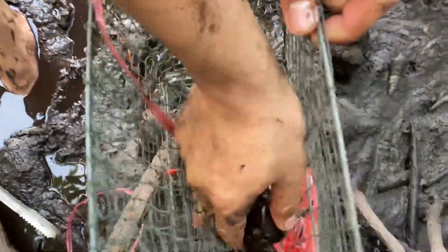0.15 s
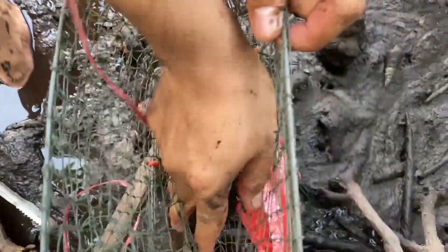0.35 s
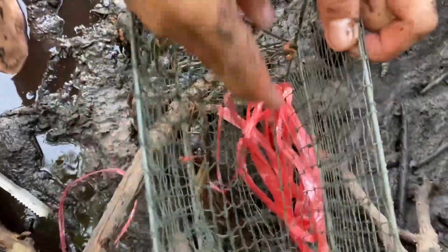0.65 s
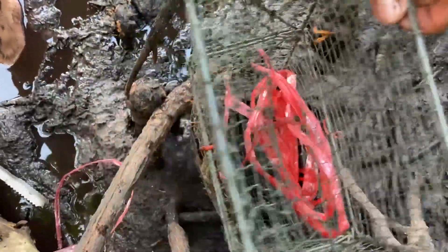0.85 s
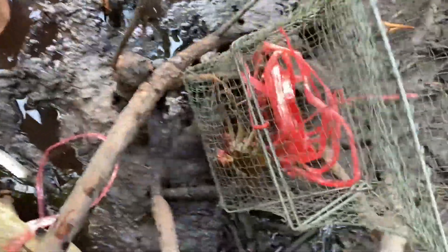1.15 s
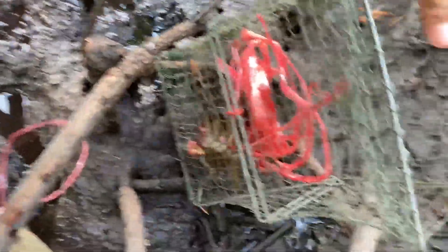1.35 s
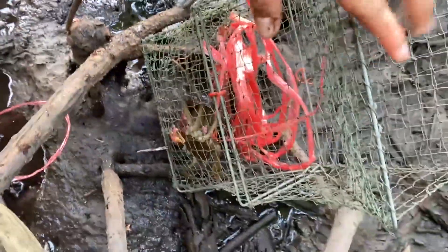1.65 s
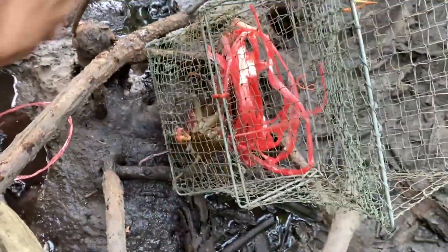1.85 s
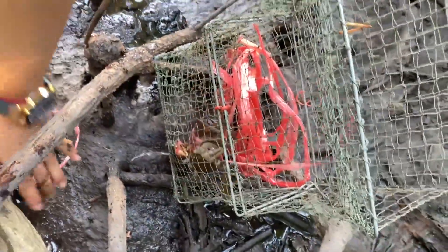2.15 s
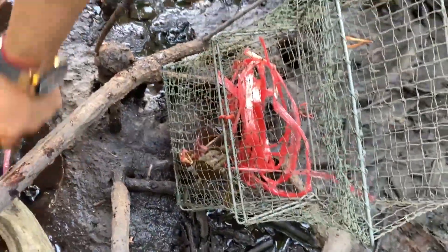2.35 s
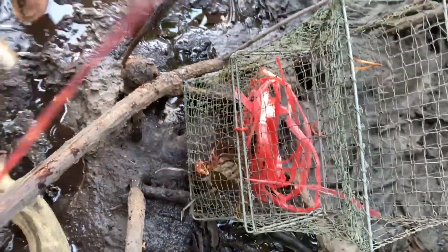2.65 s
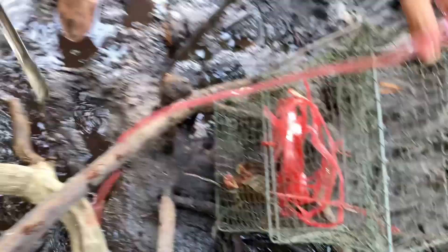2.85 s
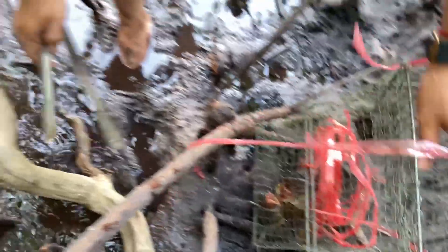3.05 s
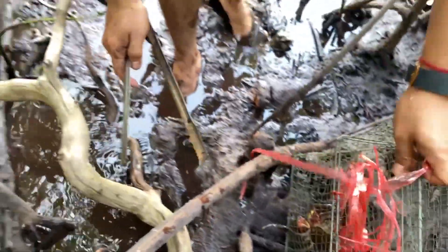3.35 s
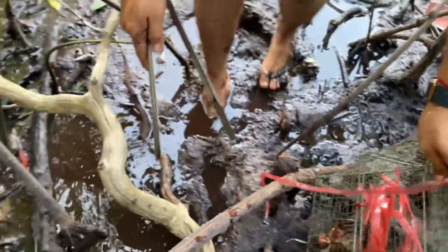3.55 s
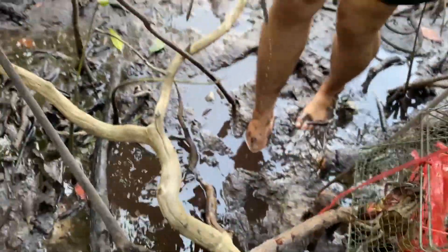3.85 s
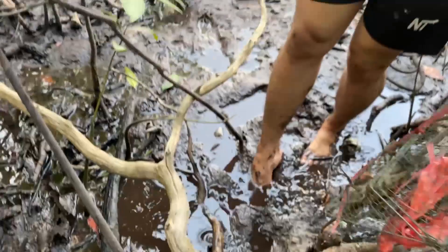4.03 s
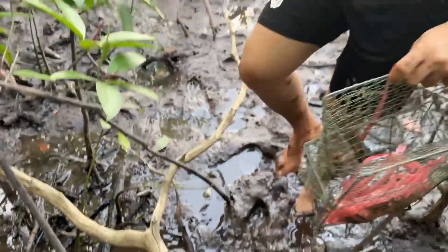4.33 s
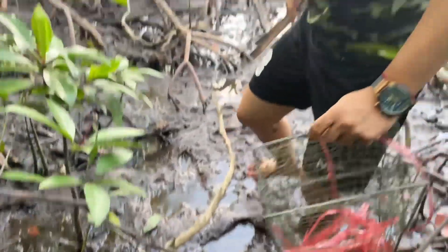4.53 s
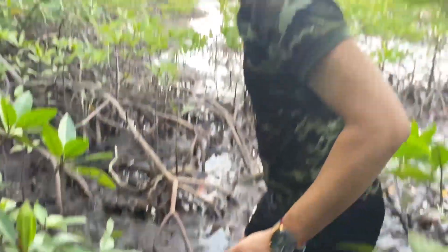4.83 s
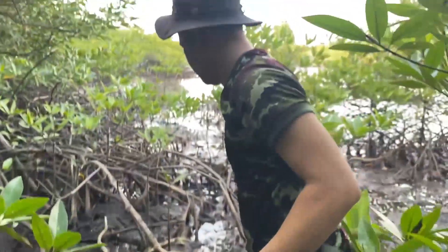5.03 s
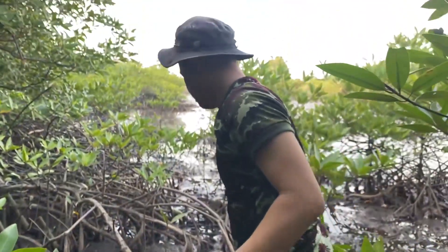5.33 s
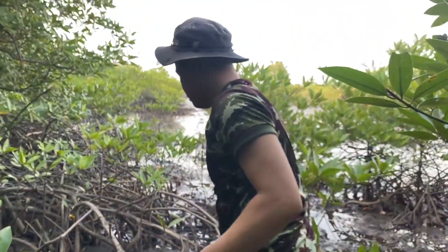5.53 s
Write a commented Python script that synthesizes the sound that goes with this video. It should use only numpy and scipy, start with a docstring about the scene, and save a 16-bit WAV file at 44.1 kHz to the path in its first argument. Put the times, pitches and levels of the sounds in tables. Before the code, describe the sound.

Close handling of a net trap with crisp snaps and a scraping ribbon, followed by short wet mud slurps over a low outdoor rumble.

```python
"""A mangrove flat: a wire-mesh crab trap is baited and lifted, a plastic ribbon drawn out, bare feet tread wet mud.
Netting and ribbon are swarms of tiny noise clicks shaped by hand strokes; sharper ticks are snaps with a short ring.
Mud crackles as small decaying sines and film clicks; air pockets swell and ring, slurps are trembling glides.
Bird calls glide far off among the trees over a low noise rumble and a faint hiss of open air.
A hand-held phone hears it through two ports, which shift the treble's phase; carrying it adds low noise."""
import sys
import numpy as np
from scipy import signal
from scipy.fft import rfft, irfft
from scipy.io import wavfile
from scipy.ndimage import uniform_filter1d

SR = 44100
rng = np.random.default_rng(int(sys.argv[2]) if len(sys.argv) > 2 else 0)


def wrap_up_sound(samples):
    """Save the sound to the file named by the first command line argument, as 16-bit audio."""
    columns = np.atleast_2d(samples).T
    # keep every value between -1 and 1, then stretch to whole-number steps
    tamed = np.clip(columns, -1, 1)
    steps = np.round(tamed * 32767).astype(np.int16)
    wavfile.write(sys.argv[1], SR, steps)


N = 250929
TIME = np.arange(N) / SR  # s
FREQS = np.arange(N // 2 + 1) * SR / N  # Hz


def undb(db):
    """Decibels to gain."""
    return 10 ** (np.asarray(db) / 20)


def unit(x):
    """Scale to rms 1."""
    return x / np.sqrt(np.mean(x ** 2))


def balance(left_over_right_db):
    """Gains of the left and right port, half the difference on each."""
    return undb(np.array([[left_over_right_db], [-left_over_right_db]]) / 2)


def gain_curve(rows):
    """Gain over time from (start_s, level_db) rows, at -120 dB outside them."""
    s, db = np.transpose(rows)
    return undb(np.interp(TIME, s, db, left=-120, right=-120))


def strokes(rows, attack_s, release_s):
    """Gain over time of (start_s, hold_s, level_db) movements: each swells up to its start, holds and dies away."""
    power = 0
    for s, hold, db in rows:
        before = np.maximum(s - TIME, 0) / attack_s
        after = np.maximum(TIME - s - hold, 0) / release_s
        power = power + undb(db) ** 2 * np.exp(-2 * np.minimum(before + after, 20))
    return np.sqrt(power)


def walk(rate_per_s):
    """Smooth random wander of spread 1."""
    return unit(signal.resample(rng.standard_normal(int(rate_per_s * N / SR) + 2), N))


def colour(x, points):
    """Filter by a (freq_hz, level_db) spectrum, straight in log frequency; rms 1."""
    hz, db = np.transpose(points)
    gain = undb(np.interp(np.log(FREQS + 1), np.log(hz), db))
    return unit(irfft(rfft(x) * gain, N))


def add(out, s, x):
    """Mix a short sound in at time s."""
    i = max(int(s * SR), 0)
    out[..., i:i + x.shape[-1]] += x[..., :N - i]


def lead(pair, radians):
    """Let the left channel lead the right by a phase at each frequency."""
    return irfft(rfft(pair) * np.exp(.5j * np.array([radians, -radians])), N)


def scatter(x, t60, wet_db):
    """Direct sound plus a diffuse tail from ground, roots and leaves, different at each port."""
    t = TIME[:int(t60 * SR) + 2]
    tail = rng.standard_normal((2, len(t))) * np.exp(-np.log(1000) * t / t60)
    tail *= undb(wet_db) / np.linalg.norm(tail, axis=1, keepdims=True)
    wet = signal.fftconvolve(np.atleast_2d(x), tail, axes=-1)[:, :x.shape[-1]]
    return (x + wet) / np.hypot(1, undb(wet_db))


def slips(rate_per_s, spread_db, decay_s, apart_db):
    """Tiny noisy clicks of uneven size, partly different at the two ports."""
    size = undb(spread_db * np.clip(rng.standard_normal(N), -2, 2))
    energy = size ** 2 * (rng.random(N) < rate_per_s / SR)
    energy = signal.lfilter([1], [1, -np.exp(-1 / (decay_s * SR))], energy + 1e-9)
    energy /= uniform_filter1d(energy, SR // 16)  # level out the slower swells
    noise = rng.standard_normal(N) + undb(apart_db) * rng.standard_normal((2, N))
    return np.sqrt(energy) * noise


def whistles(rows, waver, t60, wet_db):
    """Gliding tones whose pitch trembles by a share (waver), each with a scattered tail."""
    out = np.zeros((2, N))
    for s, length, start_hz, end_hz, db in rows:
        u = np.linspace(0, 1, int(length * SR))
        tremble = np.interp(u * length, np.arange(200) / 400, rng.standard_normal(200))
        pitch = (start_hz + (end_hz - start_hz) * u) * (1 + waver * tremble)
        note = np.sqrt(4 * u * (1 - u)) * np.sin(2 * np.pi * np.cumsum(pitch) / SR)
        add(out, s, undb(db) * scatter(np.pad(note, (0, SR // 2)), t60, wet_db))
    return out


def background(apart_db=-7, skew_db=-4, air_db=-62):
    """A low rumble, nearly alike at both ports, under the faint hiss of open air."""
    # rumble spectrum: freq_hz, level_db
    rumble_colour = [(22, -29), (34, -28), (48, -1), (61, -1.5), (72, 1.5), (88, 0), (103, -6), (122, -1.5),
                     (150, -7.5), (200, -15), (275, -20), (330, -25), (480, -35.5), (1000, -74)]
    # open-air spectrum: freq_hz, level_db
    air_colour = [(200, 16.5), (400, 7.5), (800, 7), (1500, -6), (2500, -8.5), (4000, -0.5), (8000, -15.5),
                  (11000, -33.5), (16000, -94)]
    rumble_db, wander_db, wander_per_s = -48, 1.3, 12
    low = rng.standard_normal(N) + undb(apart_db) * rng.standard_normal((2, N))
    low = colour(low, rumble_colour)
    low /= np.sqrt(uniform_filter1d(np.mean(low ** 2, axis=0), SR // 6))  # steady before it wanders
    low *= undb(rumble_db + wander_db * walk(wander_per_s)) * balance(skew_db)
    # the hiss is mostly separate at the two ports
    air = colour(rng.standard_normal(N) + 3.04 * rng.standard_normal((2, N)), air_colour)
    return low + undb(air_db) * air


def netting(lift_db=3, apart_db=-2):
    """Strands catch and slip over each other in dense little clicks."""
    # strokes of hands and leaves over the netting, before the common lift:
    # start_s, hold_s, level_db, fizz_db (fine fizz of the strands relative to the stroke)
    rubs = [(0.034, 0.095, -64, -37), (0.224, 0.12, -58.5, -11), (0.498, 0.083, -47.5, -9.5),
            (1.255, 0.09, -67, -18), (1.434, 0.17, -70.5, -20), (1.75, 0.074, -68.5, -26),
            (3.01, 0.41, -63, -13), (3.34, .015, -54.5, -19), (3.498, 0.34, -64.5, -13),
            (4.315, 0.081, -57.5, -17), (4.79, 0.11, -58, -24), (5.272, 0.12, -65.5, -13),
            (5.555, 0.1, -67, -21)]
    # netting spectrum: freq_hz, level_db
    net_colour = [(150, -7), (350, 3), (600, 4), (1100, 0), (1900, 1.5), (2700, -5), (4200, 0.5),
                  (7000, 0.5), (8500, 2), (10300, -2.5), (12000, -12.5), (15000, -14), (16500, -58)]
    # spectrum of the fine fizz: freq_hz, level_db
    fizz_colour = [(5000, -43), (9000, -18), (11500, -12), (15000, -7.5), (16500, -18)]
    attack_s, release_s = 0.031, 0.067
    # the trap stirs faintly, more once it is tied and carried; levels before the lift
    rest_db, carried_db, picked_up_s = -78.5, -71, 1.9
    grain = slips(2600, 4.5, .0007, apart_db)
    rub = strokes([(s, hold, db) for s, hold, db, _ in rubs], attack_s, release_s)
    fizz = strokes([(s, hold, db + fizz_db) for s, hold, db, fizz_db in rubs], attack_s, release_s)
    stir = undb(np.where(TIME < picked_up_s, rest_db, carried_db))
    body = colour(grain, net_colour) * np.hypot(rub, stir)
    return undb(lift_db) * (body + colour(grain, fizz_colour) * fizz)


def birds(lift_db=2):
    """Thin far calls: gliding tones smeared by the trees."""
    # bird notes, before the common lift and the smearing: start_s, length_s, start_hz, end_hz, level_db
    notes = [(.78, 0.12, 3700, 3580, -61), (.83, 0.27, 4040, 3610, -64.5), (.9, .081, 3555, 3330, -59.5),
             (.94, 0.029, 2120, 2270, -57.5), (1.0, .27, 3330, 3010, -72.5),
             (1.1, 0.085, 3680, 3410, -61.5), (1.2, 0.059, 2140, 2206, -62),
             (1.249, 0.13, 3420, 3470, -66.5), (1.63, 0.047, 2890, 2910, -61),
             (1.68, 0.098, 3004, 3153, -57.5), (2.455, .4, 3183, 3280, -64), (3.17, 0.17, 3234, 3136, -57),
             (.1, 0.32, 7730, 7700, -62.5), (1.44, 0.069, 7760, 7970, -59.5), (1.89, 0.44, 7940, 7910, -64)]
    return undb(lift_db) * whistles(notes, waver=.021, t60=.6, wet_db=5)


def ticks(snap_s=0.0034, ring_s=0.00096, lift_db=3.5):
    """A short broad snap with a ring of a few cycles from the strand or film that let go."""
    # sharpest ticks of mesh, ribbon and breaking mud film, before the lift, scattering and halved snap:
    # start_s, peak_db, ring_hz, snap_db (broad snap relative to the ring)
    tick_rows = [(.1165, -37, 6140, -8), (.1465, -44, 1570, -23), (.305, -38.5, 1670, -13),
                 (.375, -44.5, 11000, -3.5), (.41, -42.5, 1660, -23), (.4925, -39, 3830, 5.5),
                 (.571, -32.5, 1840, -13), (.5775, -26.5, 1410, -24), (.592, -34.5, 10400, -20),
                 (.674, -48, 1600, 2.5), (1.3375, -36, 5430, -23), (1.801, -45, 5740, -4.5),
                 (2.099, -39.5, 5000, -6), (2.147, -43.5, 1840, -7), (2.352, -48, 4170, -2),
                 (2.5525, -39.5, 6560, -1.5), (2.6678, -34.5, 9260, -13), (2.765, -47, 7200, 1),
                 (2.9225, -37, 9950, -7.5), (2.9825, -37.5, 10300, -11), (3.042, -46, 9400, -1.5),
                 (3.492, -42.5, 6350, 6), (3.625, -39.5, 6460, 0), (3.69, -31.5, 3500, -16),
                 (3.7808, -35.5, 3750, -27), (3.7975, -31.5, 4850, -3.5), (4.2552, -36, 4270, -12),
                 (4.32, -38.5, 5500, -4), (4.3682, -38, 6700, 1.5), (4.55, -44, 3180, -11),
                 (4.789, -53, 1600, -4.5), (5.164, -35, 2360, -2)]
    # spectrum of the snap: freq_hz, level_db
    tick_colour = [(400, -23), (1500, -23), (4000, 5.5), (7000, 1.5), (10000, 4.5), (14000, -5.5),
                   (16000, -4)]
    out, t = np.zeros((2, N)), TIME[:SR // 30]
    hiss = colour(rng.standard_normal(N), tick_colour)
    for k, (s, db, hz, snap_db) in enumerate(tick_rows):
        snap = hiss[k * len(t):(k + 1) * len(t)] * np.exp(-t / snap_s)
        ring = np.sin(2 * np.pi * hz * t) * np.exp(-t / ring_s)
        tick = ring + .5 * undb(snap_db) * snap
        add(out, s, undb(db + lift_db) * scatter(tick, t60=.028, wet_db=-3))
    return out


def sliding_echo(x, lag_s, share):
    """A close reflection whose path changes as the hands move, sweeping the colour."""
    late = TIME - lag_s * np.exp(0.286 * walk(9))
    return x + share * np.array([np.interp(late, TIME, port) for port in x])


def ribbon(lift_db=2, catch_db=2.0, lead_ms=0.31, apart_db=-2):
    """The ribbon chatters and squeaks as it is pulled, off to the left."""
    # pulls, sliding over wood and mesh, before lift and catching: start_s, hold_s, level_db
    pulls = [(2.07, 0.12, -57.5), (2.1, 0.087, -52), (2.355, 0.019, -51.5), (2.42, 0.17, -55.5),
             (2.54, 0.057, -55), (2.666, 0.057, -52), (2.75, 0.024, -63), (2.81, 0.11, -56)]
    # squeaks where the ribbon catches, before scattering: start_s, length_s, start_hz, end_hz, level_db
    squeaks = [(2.09, 0.055, 5300, 6000, -47), (2.165, 0.021, 4910, 5500, -42.5),
               (2.8, 0.055, 6550, 6670, -53.5), (2.86, 0.072, 4950, 4850, -50),
               (3.03, 0.051, 5830, 4700, -56)]
    # ribbon spectrum: freq_hz, level_db
    ribbon_colour = [(400, -2), (1200, -6.5), (2200, -8.5), (3200, -2), (5200, 1), (6700, -1), (8200, -5),
                     (10300, -2.5), (12000, -10.5), (15000, -9), (16500, -31)]
    grain = sliding_echo(slips(3200, 4, .0008, apart_db), lag_s=.0006, share=.35)
    pull = strokes(pulls, attack_s=0.0096, release_s=0.03)
    catching = undb(catch_db * walk(50))
    chatter = undb(lift_db) * colour(grain, ribbon_colour) * pull * catching
    both = chatter + whistles(squeaks, waver=.032, t60=.04, wet_db=0)
    # the head start of the left port, two turns at most
    phase = np.minimum(2 * np.pi * FREQS * lead_ms / 1000, 4 * np.pi)
    return lead(both, phase)


def mud_squeeze():
    """Gain over time of the squeezed mud, which holds and gives way in little jerks."""
    # a foot presses into the mud or pulls free, before the jerks: start_s, hold_s, crackle level_db
    presses = [(3.348, 0.054, -46.5), (3.49, 0.064, -56), (3.69, 0.029, -49.5), (3.775, 0.063, -54.5),
               (4.262, 0.071, -46.5), (4.36, 0.052, -55.5), (4.55, 0.01, -66), (4.8, 0.017, -57.5),
               (5.205, 0.039, -55), (5.27, 0.0056, -45.5), (5.3, 0.032, -54.5), (5.44, 0.055, -63.5)]
    # trodden mud keeps seeping between the steps, before the jerks: start_s, crackle level_db
    seep = [(3.05, -84), (3.3, -58), (4.05, -69), (4.22, -62), (4.8, -62), (5.1, -72), (5.69, -69)]
    stick_db, stick_per_s = 2, 120
    pressed = strokes(presses, attack_s=0.012, release_s=0.015)
    return np.hypot(pressed, gain_curve(seep)) * undb(stick_db * walk(stick_per_s))


def crackle(squeeze, low_hz=550, octaves=2.66, film_db=-1):
    """Squeezed mud: a swarm of small bubbles and tearing films of water."""
    # wet mud spectrum: freq_hz, level_db
    mud_colour = [(200, -11), (400, -25), (620, -9), (1000, 1), (1900, 7.5), (2700, 2.5), (4000, 12.5),
                  (6500, 6), (9000, -24), (16000, -36)]
    swarm, t = np.zeros((2, N)), TIME[:SR // 60]
    for when, size, strength, place, glide in rng.random((N // 32, 5)):
        hz = low_hz * 2 ** (octaves * size)
        age = t * hz / 3.5  # each dies away over 3.5 cycles
        bend = 1 + (glide - .3) * 0.037 * np.tanh(age)  # most rise in pitch, a few sink
        # bubbles lie all around the foot
        port_phase = (place - .5) * hz / 1800 * np.array([[1], [-1]])
        bubble = np.exp(-age) * np.sin(2 * np.pi * hz * t * bend + port_phase)
        add(swarm, when * N / SR, strength ** 3 * bubble)
    films = slips(rate_per_s=1400, spread_db=5, decay_s=.0006, apart_db=1)
    return colour(unit(swarm) + undb(film_db) * unit(films), mud_colour) * squeeze


def pop(hz, swell_s, rise_oct, flutter):
    """One air pocket: a ring that swells, glides up as the opening cavity shrinks, and fades."""
    age = TIME[:len(flutter)] / swell_s
    pitch = hz * 2 ** (rise_oct * np.tanh((age - 1) / 2))
    return np.sin(2 * np.pi * np.cumsum(pitch) / SR) * age * np.exp(1 - age) * flutter


def pockets(squeeze, rough=0.19, skew_db=-4.5, tail_s=0.072):
    """Big air pockets burst one by one; small ones open at random, as strongly as the mud is squeezed."""
    # big pockets under the feet, before flutter, scattering and port balance:
    # start_s, pitch_hz, peak_db, swell_ms
    big_pockets = [(3.225, 527, -50, 3.7), (3.346, 672, -33.5, 3), (3.350, 910, -38, 2.4),
                   (3.352, 580, -32.5, 4.1), (3.359, 1300, -40, 2.6), (3.367, 606, -35, 3.2),
                   (3.378, 607, -37, 2.5), (3.382, 1454, -37, 2.5), (3.389, 1800, -36, 1.4),
                   (3.392, 607, -36, 3), (3.395, 1110, -30, 0.6), (3.407, 1720, -36, 1.8),
                   (3.446, 1830, -33, 1.2), (3.4475, 620, -26, 1.7), (3.460, 1560, -39, 1),
                   (3.461, 574, -38, 1.6), (3.515, 700, -40.5, 2.5), (3.520, 1630, -38, 1.7),
                   (3.549, 953, -37.5, 1.1), (3.552, 1420, -32, 2.4), (3.618, 2090, -48.5, 2.2),
                   (3.630, 3480, -44, 1.6), (3.661, 1210, -50, 3.5), (3.683, 1030, -39.5, 0.86),
                   (3.688, 2050, -33.5, 0.78), (3.707, 2140, -44, 2.7), (3.771, 1290, -50, 3.4),
                   (3.822, 1320, -36.5, 1.6), (3.822, 2630, -42.5, 2.2), (4.06, 1520, -53, 2.1),
                   (4.286, 680, -37, 2.4), (4.310, 896, -41, 2.3), (4.320, 2150, -34, 0.93),
                   (4.322, 885, -39.5, 2.6), (4.360, 2100, -39.5, 1), (4.820, 2060, -47, 1.6),
                   (4.821, 890, -45, 0.72), (5.201, 1530, -32, 0.72), (5.201, 710, -40, 1.8),
                   (5.269, 1790, -24, 1.7), (5.2705, 727, -29, 2.3), (5.2998, 2200, -31, 0.91),
                   (5.303, 1250, -42, 2), (5.457, 2150, -53, 3)]
    big_rise_oct, small_rise_oct = 0.029, 0.19
    small_db = 6  # strongest small ring over the crackle, before scattering
    small_low_hz, small_octaves, small_swell_cycles = 908, 1.4, 3.5
    out, count = np.zeros((2, N)), SR // 16
    flutter = 1 + rough * walk(900)  # soft wet walls shake the ring
    for k, (s, hz, db, swell_ms) in enumerate(big_pockets):
        ring = pop(hz, swell_ms / 1000, big_rise_oct, flutter[k * count:(k + 1) * count])
        add(out, s, undb(db) * scatter(ring, tail_s, wet_db=-8))
    for when, size, strength in rng.random((N // 800, 3)):
        i = int(when * (N - count))
        hz = small_low_hz * 2 ** (small_octaves * size)
        ring = pop(hz, small_swell_cycles / hz, small_rise_oct, flutter[i:i + count])
        gain = undb(small_db) * squeeze[i] * strength
        add(out, i / SR, gain * scatter(ring, tail_s, wet_db=-8))
    return out * balance(skew_db)


def slurps(tail_s=0.061, rough=0.45):
    """Gliding notes of air drawn through wet mud, sputtering as the gap sticks and opens."""
    # air sucked through a narrowing gap, before sputter and scattering:
    # start_s, length_s, start_hz, end_hz, level_db
    gaps = [(3.72, 0.025, 780, 1430, -42.5), (4.245, 0.04, 1492, 1370, -43), (4.29, 0.026, 720, 865, -42),
            (5.21, 0.04, 560, 846, -47), (5.375, 0.046, 703, 1000, -55.5), (5.39, 0.049, 1410, 1750, -61)]
    sputter = (1 + rough * walk(500)) / np.hypot(1, rough)
    return whistles(gaps, waver=0.053, t60=tail_s, wet_db=-3) * sputter


def sway():
    """Moving air and footfalls shake the phone as it is carried: low noise, alike at both ports."""
    # shaking over time: start_s, level_db
    shakes = [(4.3, -83), (4.8, -46), (5.2, -48), (5.27, -39), (5.69, -49.5)]
    # spectrum of the shaking: freq_hz, level_db
    sway_colour = [(15, -32), (30, -16), (55, -3.5), (85, -3.5), (125, -7), (200, -33), (600, -90)]
    return colour(rng.standard_normal(N), sway_colour) * gain_curve(shakes)


def scene():
    """Trap and mud close by, with a faint return from the mangroves."""
    squeeze = mud_squeeze()
    trap = netting() + ticks() + ribbon()
    mud = crackle(squeeze) + pockets(squeeze) + slurps()
    near = scatter(trap + mud, t60=.5, wet_db=-17)
    return background() + near + birds() + sway()


def record(dry):
    """The two ports shift the phase of the treble; the top is cut."""
    # phase by which the left port leads the right: freq_hz, lead_radians
    ports = [(0, 0), (750, .6), (1800, 0), (6800, 0), (8400, -3), (10100, -6.3), (12100, -9.4),
             (14000, -12.6), (16000, -16)]
    top_hz = 15900
    hz, radians = np.transpose(ports)
    heard = lead(dry, np.interp(FREQS, hz, radians))
    return signal.sosfilt(signal.ellip(8, .2, 70, top_hz, fs=SR, output="sos"), heard)


dry = scene()
out = record(dry)
wrap_up_sound(out)
```